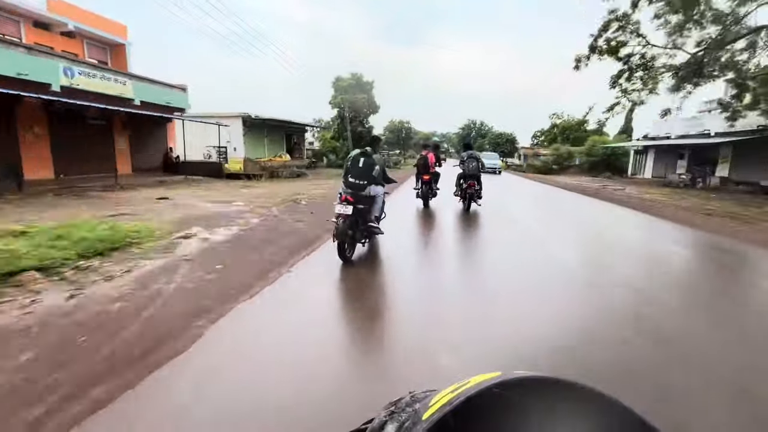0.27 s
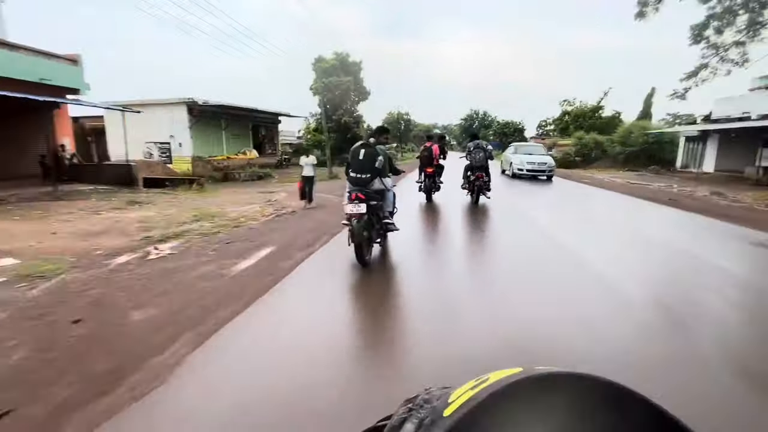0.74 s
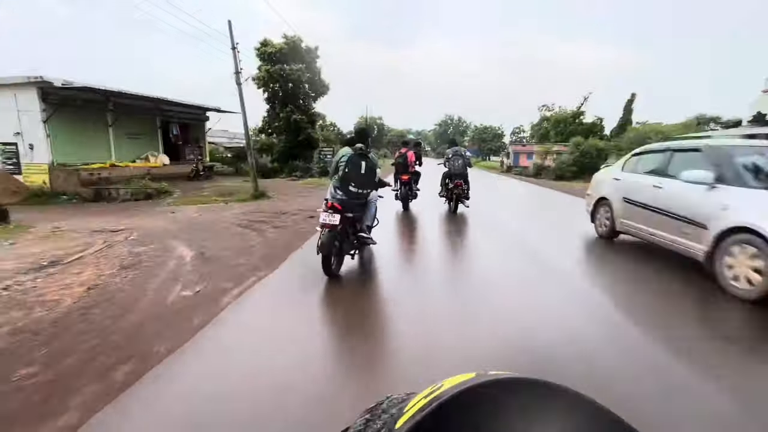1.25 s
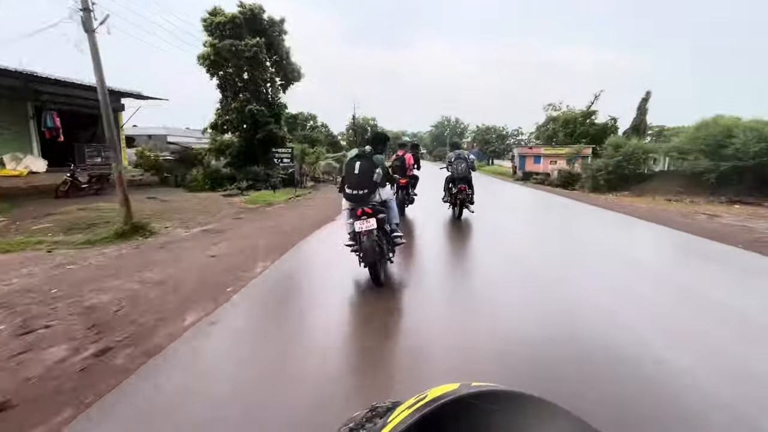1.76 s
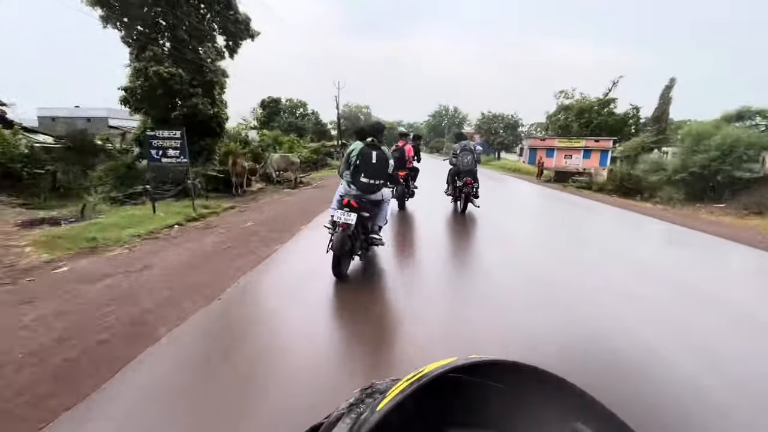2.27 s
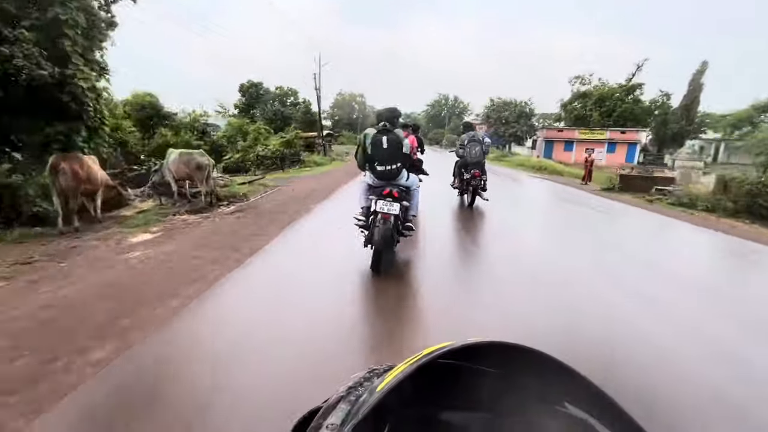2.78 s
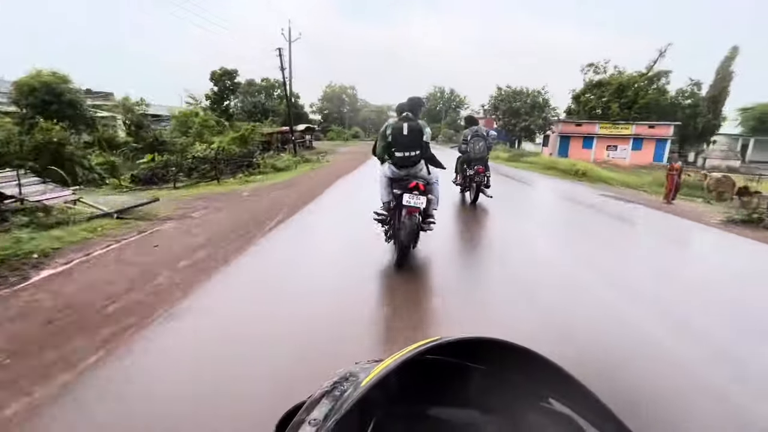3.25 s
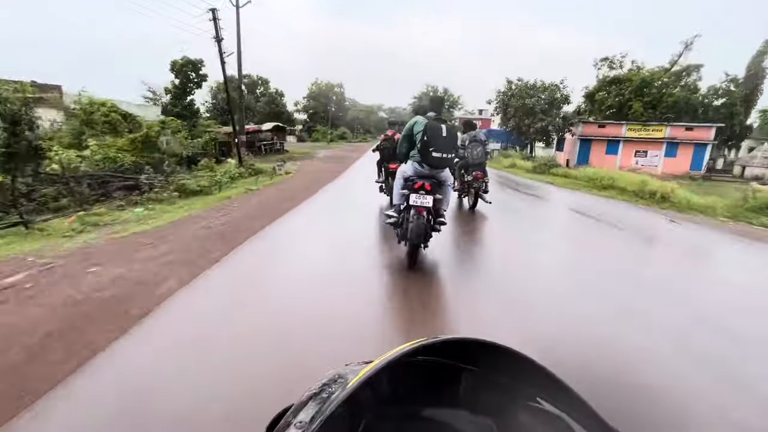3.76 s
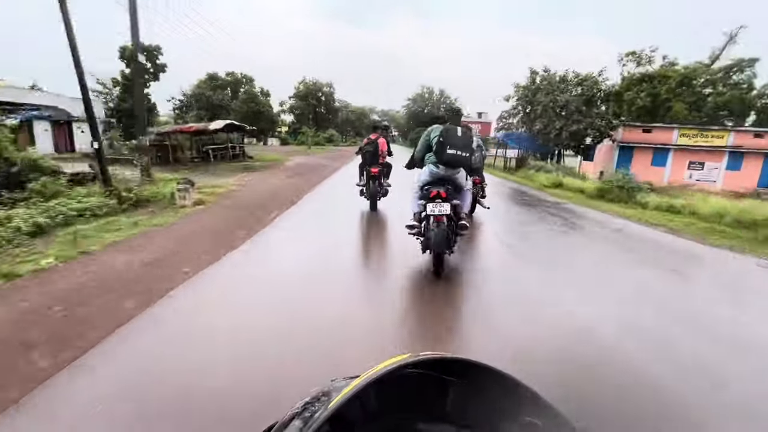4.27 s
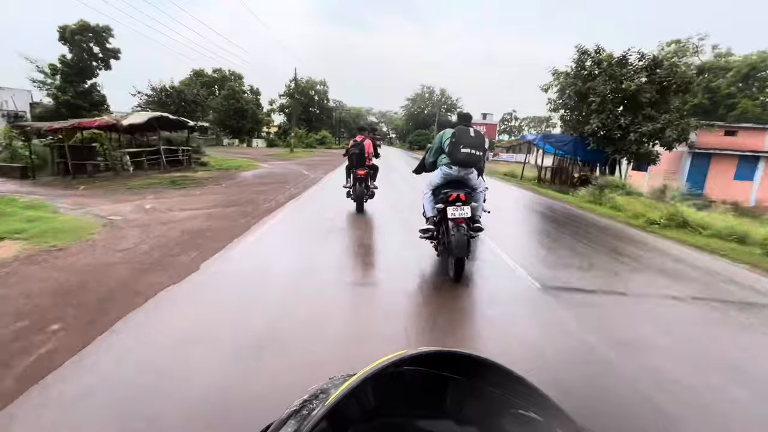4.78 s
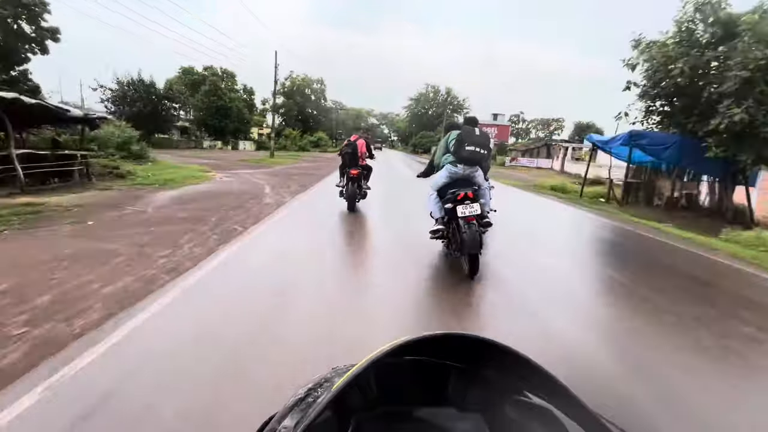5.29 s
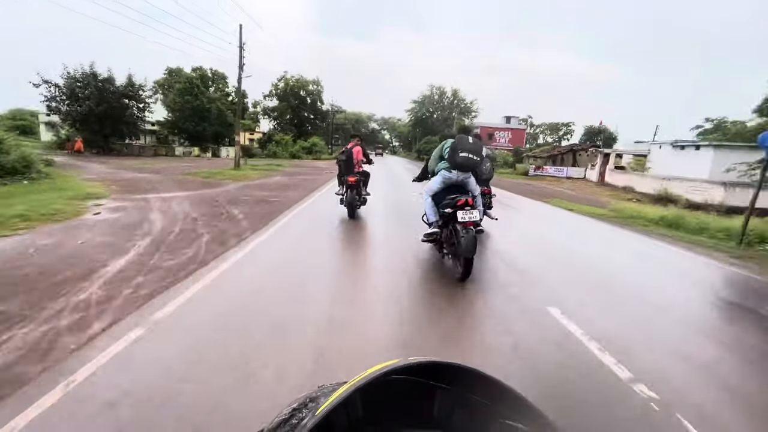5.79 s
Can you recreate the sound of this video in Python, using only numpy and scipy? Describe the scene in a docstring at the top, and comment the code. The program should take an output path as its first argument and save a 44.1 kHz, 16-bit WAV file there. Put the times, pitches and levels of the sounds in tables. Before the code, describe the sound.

Onboard a single-cylinder motorcycle on a wet road: deep throbbing engine boom surging and dropping under wind buffeting, tyre roar, spray hiss, knocks and ticks.

```python
"""One hears a throbbing single-cylinder motorcycle under wind buffeting, on a wet road, its boom dropping and swelling.
The place is the rider's own: a camera carried on the ride, its two microphone ports close to engine, wind and wheels.
Firings ring exhaust resonances; shaped noise makes wind, air and tyre roar, gas puffs, spray and mist.
Damped rings make the wheel ticks, drops and grit; noise bursts and short hollow notes make the knocks and thumps."""
import sys
import numpy as np
from scipy import signal
from scipy.fft import rfft, irfft, next_fast_len
from scipy.io import wavfile
from scipy.ndimage import uniform_filter1d

SR = 44100
rng = np.random.default_rng(int(sys.argv[2]) if len(sys.argv) > 2 else 0)


def wrap_up_sound(samples):
    """Save the sound to the file named by the first command line argument, as 16-bit audio."""
    columns = np.atleast_2d(samples).T
    # keep every value between -1 and 1, then stretch to whole-number steps
    tamed = np.clip(columns, -1, 1)
    steps = np.round(tamed * 32767).astype(np.int16)
    wavfile.write(sys.argv[1], SR, steps)


N = 265871
T = np.arange(N) / SR  # time of each sample, s

# Engine speed: (time [s], firing rate [1/s])
FIRING_RATE = [(0.0, 29.93), (0.5, 29.83), (1.0, 29.32), (2.0, 28.89), (2.5, 28.87), (4.0, 27.76),
               (5.0, 27.51), (5.5, 27.51), (6.03, 27.32)]
# Low boom of exhaust and wind outside the lulls: (time [s], level [dB])
BOOM_LEVEL = [(0.0, -23), (0.9, -32), (1.45, -23), (1.85, -25.5), (2.3, -18), (3.1, -24.5), (3.75, -16),
              (4.6, -18), (5.0, -15.5), (5.4, -24), (6.03, -15.5)]
# Boom lulls: (start [s], time from start until recovery begins [s], depth [dB])
BOOM_LULLS = [(0.063, 0.09, 27), (0.64, 0.18, 19.5), (0.875, 0.29, 26), (1.562, 0.18, 23),
              (2.52, 0.31, 35.5), (3.229, 0.13, 14), (4.49, 0.045, 7), (4.995, 0.14, 23),
              (5.717, 0.086, 7.5)]
# Wind on the ports, relative spectrum: (frequency [Hz], density [dB per Hz])
BUFFET_COLOUR = [(20, -47), (42, -28), (62, 6.5), (85, 0), (115, 23), (150, 5), (200, -24.5), (260, -19),
                 (600, -74)]
# Air and tyre roar between gusts: (time [s], level [dB])
RUSH_LEVEL = [(0.0, -39), (1.1, -38), (2.4, -34.5), (3.5, -36.5), (4.5, -32.5), (6.03, -35)]
# Air and tyre roar, relative spectrum: (frequency [Hz], density [dB per Hz])
RUSH_COLOUR = [(160, -47), (230, -16), (300, -19.5), (400, 3), (520, 3.5), (650, -1), (820, -1), (1120, -2),
               (1270, 2.5), (1550, -2.5), (1900, -10), (2300, -21), (3200, -52), (7000, -49)]
# Gusts: (middle [s], half length [s], roar lift [dB], spray lift [dB])
GUSTS = [(0.15, 0.11, 2, 5), (0.691, 0.06, 5.5, 1.5), (0.87, 0.024, 3.5, 0), (1.294, 0.089, 1, 4.5),
         (1.47, 0.055, 1, 5.5), (1.653, 0.098, 0.5, 3.5), (2.541, 0.063, 4, 0), (2.654, 0.045, 3.5, 5.5),
         (2.813, 0.019, 6, 8.5), (3.227, 0.082, 3.5, 3.5), (4.036, 0.02, 2, 0), (4.26, 0.1, 1, 2.5),
         (5.023, 0.074, 5, 4), (5.507, 0.094, 2.5, 7.5), (5.75, 0.086, 4, 3), (5.94, 0.074, 4.5, 5)]
# Ragged air in gusts, relative spectrum: (frequency [Hz], density [dB per Hz])
BLUSTER_COLOUR = [(150, -35), (210, -11), (350, -14), (550, 0), (750, 6), (1000, -3), (1400, -7),
                  (2400, -19), (4500, -40)]
# Spray hiss, relative spectrum: (frequency [Hz], density [dB per Hz])
SPRAY_COLOUR = [(1200, 0.5), (2300, 6.5), (2900, 0.5), (3700, 4), (4600, 1), (5150, -3), (5600, -2.5),
                (6300, -1), (7300, -8), (9000, -13), (11000, -27)]
# Fine mist off the wet road: (time [s], level [dB])
MIST_LEVEL = [(0.0, -58), (1.1, -58), (1.42, -51.5), (2.05, -58), (3.6, -56), (4.18, -53.5), (4.36, -60),
              (4.55, -52.5), (4.8, -56), (6.03, -55.5)]
# Mist, relative spectrum: (frequency [Hz], density [dB per Hz])
MIST_COLOUR = [(6000, -23), (7700, -2.5), (8250, 5), (9500, 1), (10300, -6), (11000, -18), (11600, -53)]
# Ticking wheel: (time [s], speed [turns/s])
WHEEL_SPEED = [(0.0, 14.66), (1.0, 14.8), (1.7, 14.9), (2.5, 14.78), (3.4, 14.71), (5.0, 14.76),
               (6.03, 14.76)]
# How hard the wheel brushes, before each tick's random unevenness: (time [s], level [dB])
BRUSH_FORCE = [(0.0, -60), (1.2, -50), (1.72, -36), (2.05, -49), (2.6, -41), (2.95, -27.5), (3.2, -50),
               (3.65, -35.5), (3.85, -38), (4.3, -39.5), (4.5, -35.5), (4.8, -36), (5.05, -28),
               (5.25, -36.5), (5.85, -28)]
# Body of a tick, damped modes: (frequency [Hz], width [Hz], relative level [dB])
TICK_BODY = [(4240, 250, 4), (4640, 160, 3.5), (5590, 155, 3.5), (6500, 420, -30)]
# Bright edge of a tick, damped modes: (frequency [Hz], width [Hz], relative level [dB])
TICK_EDGE = [(6880, 310, -3.5), (8370, 130, -8), (8940, 175, -6.5), (9590, 180, -2), (10900, 560, -5)]
# Big drops beside the left port, before panning: (time [s], peak level [dB])
BIG_DROPS = [(0.147, -33), (0.34, -34), (0.6928, -34), (0.7257, -33), (0.806, -37), (0.864, -30.5),
             (1.4696, -31), (1.727, -31.5), (2.805, -33.5), (3.265, -32.5), (5.492, -31), (5.6672, -35)]
# Ring of a drop, damped modes: (frequency [Hz], width [Hz], relative level [dB])
DROP_RING = [(2040, 160, 2), (3600, 840, 19.5), (4500, 1050, 11), (6000, 900, -27)]
# Bodywork knocks, peak before panning:
# (time [s], peak level [dB], ring frequency [Hz], 60 dB decay [s], left minus right [dB])
KNOCKS = [(0.450, -21, 1230, 0.0075, 12.5), (0.473, -34.5, 850, 0.011, 15), (0.578, -28, 1010, 0.036, 14.5),
          (0.898, -21, 1400, 0.016, 7), (1.432, -19.5, 1420, 0.032, 8), (1.442, -20, 1160, 0.05, 3),
          (1.617, -26, 1050, 0.08, -14.5), (2.503, -16, 1340, 0.042, 4), (2.574, -24, 1300, 0.016, 9),
          (2.615, -25.5, 1540, 0.0065, 12), (2.645, -23.5, 1500, 0.027, 12.5),
          (2.789, -21, 1120, 0.031, -2), (3.210, -26.5, 1090, 0.032, -21), (3.265, -25, 1260, 0.055, 15),
          (5.004, -19, 990, 0.028, -15), (5.015, -17.5, 1020, 0.033, 18), (5.237, -23, 900, 0.032, 7),
          (5.646, -22, 1130, 0.018, 1), (5.906, -20, 1300, 0.027, 1)]
# Hollow thumps: (time [s], peak level [dB], ring frequency [Hz])
THUMPS = [(1.279, -23.5, 341), (4.160, -12, 344), (4.304, -16.5, 367), (5.721, -16.5, 361)]
# Hollow chug of the exhaust: (time [s], level [dB])
CHUG_LEVEL = [(0.0, -57), (1.1, -45), (1.9, -44.5), (2.45, -28), (2.7, -40.5), (3.1, -38.5), (3.45, -51.5),
              (3.85, -29.5), (4.3, -24.5), (4.42, -33), (4.75, -26.5), (5.02, -23), (5.12, -37.5),
              (6.03, -34.5)]
# Gas puffs, relative spectrum: (frequency [Hz], density [dB per Hz])
CHUG_COLOUR = [(130, -55), (200, -3.5), (250, -5.5), (305, 0), (345, -1.5), (390, 2.5), (440, -24.5),
               (500, -4), (620, -14.5), (1000, -29), (2000, -57)]
# Microphone ports: (frequency [Hz], coherence [0-1], phase by which left leads [rad], left minus right [dB])
PORTS = [(110.0, 0.86, -1.0, -0.9), (200.0, 0.37, -2.1, 0.7), (310.0, 0.59, -1.3, -0.1),
         (400.0, 0.73, -2.2, 0.7), (520.0, 0.76, -2.9, -0.9), (850.0, 0.48, -4.1, -0.2),
         (1100.0, 0.23, -6.8, 1.7), (1400.0, 0.57, -6.9, 3.4), (2500.0, 0.33, -8.1, 0.9),
         (3500.0, 0.12, -7.9, 6.5), (4500.0, 0.44, -6.1, 4.1), (7500.0, 0.3, -4.6, -0.3),
         (8500.0, 0.19, -2.8, -6.4), (10500.0, 0.11, -1.3, -15.6)]


def amp(db):
    """Decibels to gain."""
    return 10 ** (np.asarray(db) / 20)


def unit(x):
    """Scales to rms 1."""
    return x / np.sqrt(np.mean(x ** 2) + 1e-20)


def curve(rows):
    """Each column of a time table, sample by sample."""
    s, *columns = np.transpose(rows)
    return [np.interp(T, s, column) for column in columns]


def read(rows, hz):
    """Each column of a frequency table, on a log axis."""
    f, *columns = np.transpose(rows)
    return [np.interp(np.log(hz + 1), np.log(f + 1), column) for column in columns]


def add(mix, s, sound):
    """Mixes a stereo sound in at time s."""
    part = mix[:, max(round(s * SR), 0):][:, :sound.shape[1]]
    part += sound[:, :part.shape[1]]


def pan(db):
    """Left and right gains for a level difference, left minus right."""
    return amp(np.array([[db], [-db]]) / 2)


def wander(top_hz):
    """Smooth random motion, low-passed around top_hz; rms 1."""
    size = next_fast_len(N)
    hz = np.fft.rfftfreq(size, 1 / SR)
    spectrum = rfft(rng.standard_normal(size)) / (1 + (hz / top_hz) ** 2)
    return unit(irfft(spectrum, size)[:N])


def smooth(grid, frames, bins):
    """Blurs a random grid over time frames and frequency bins; rms 1."""
    return unit(uniform_filter1d(uniform_filter1d(grid, size=frames, axis=0), size=bins, axis=1))


def air(colour, patchy_db, ripple_db=0.):
    """Turbulent noise with drifting patches, partly shared between the two ports; rms 1."""
    frames, hz = N // 512 + 6, np.fft.rfftfreq(2048, 1 / SR)
    a, b, c, d, patches = rng.standard_normal((5, frames, len(hz)))
    patches = smooth(patches, frames=4, bins=22)
    # reflections off rider and bike cut fine, slowly shifting ripples into the spectrum
    ripples = smooth(rng.standard_normal(a.shape), frames=40, bins=2)
    coherence, phase, side_db = read(PORTS, hz)
    coherence = np.clip(coherence, 0, 1)
    left = a + 1j * b
    own = c + 1j * d  # noise only the right port hears
    right = (coherence * left + np.sqrt(1 - coherence ** 2) * own) * np.exp(-1j * phase)
    z = np.array([left * amp(side_db / 2), right * amp(-side_db / 2)])
    z *= amp(read(colour, hz)[0] + patchy_db * patches + ripple_db * ripples)
    return unit(signal.istft(z.transpose(0, 2, 1), nperseg=2048, noverlap=1536)[1][:, :N])


def ring(modes, left_lag_s=0.0007, rise_s=0.00024, detune=0.023):
    """A short ring of damped modes, randomly detuned, peak 1; it reaches the left port later."""
    t = np.maximum(np.arange(700) / SR - np.array([[left_lag_s], [0]]), 0)
    y = 0
    for hz, width, db in modes:
        cycles = hz * (1 + detune * rng.standard_normal()) * t + rng.random()
        y = y + amp(db) * np.exp(-np.pi * width * t) * np.sin(2 * np.pi * cycles)
    y = y * (1 - np.exp(-(t / rise_s) ** 2))
    return y / abs(y).max()


def swell(t, peak_s):
    """The envelope of a cavity that builds up to 1 at peak_s and dies away."""
    u = np.maximum(t, 0) / peak_s
    return (u * np.exp(1 - u)) ** 2


def crank(first_firing=0.2716):
    """Engine cycles gone by; the cylinder fires at each whole number."""
    return np.cumsum(curve(FIRING_RATE)[0]) / SR - first_firing


def firings(hz, build_s, uneven_db, jitter_s, port_db, left_lag_s, late_s):
    """Each firing, a little uneven in strength, time and side, rings one exhaust resonance; rms 1."""
    fired = T[1:][np.diff(np.floor(crank())) > 0]
    out = np.zeros((2, N))
    t = np.arange(SR // 8) / SR - np.array([[left_lag_s], [0]])
    note = swell(t, build_s) * np.sin(2 * np.pi * hz * t)
    for s, (strength, slip, side) in zip(fired, 2 * rng.random((len(fired), 3)) - 1):
        gains = amp(uneven_db * strength) * pan(port_db * side)
        add(out, s + late_s + jitter_s * slip, gains * note)
    return unit(out)


def exhaust(level_db=-0.36):
    """The deep note of the silencer, near four times the firing rate, rung by each firing."""
    note = firings(hz=111.4, build_s=0.015, uneven_db=1.0, jitter_s=0.00035,
                   port_db=8.0, left_lag_s=0.0015, late_s=0)
    return amp(level_db) * note


def buffet(level_db=-2.0):
    """Wind turbulence rumbles on the microphone ports."""
    return amp(level_db) * air(BUFFET_COLOUR, patchy_db=-3.5)


def boom_level(fall_s=0.076, recover_s=0.1):
    """Gain of the low boom: it falls quickly into each lull and recovers more slowly."""
    down = 0
    for s, hold, depth in BOOM_LULLS:
        fall = np.clip((T - s) / fall_s, 0, 1)
        recovery = np.exp(-np.maximum(T - s - hold, 0) / recover_s)
        down = down + depth * fall * recovery
    return amp(curve(BOOM_LEVEL)[0] - down)


def boom(flutter_db=0.52, flutter_hz=21.2):
    """Exhaust and wind together, beating evened out; their strength swells and sinks, and drops in the lulls."""
    low = (exhaust() + buffet()) * amp(flutter_db * wander(flutter_hz))
    power = (low ** 2).mean(0)
    strength = np.sqrt(uniform_filter1d(uniform_filter1d(power, size=SR // 14), size=SR // 14))
    return low / strength * boom_level()


def rush(gust_db, flutter_db=1.5, flutter_hz=85.4, sway_db=0.88, sway_hz=30.0, throb_db=-0.2):
    """Air and tyre roar, fluttering in the slipstream and dipping slightly at each firing."""
    motion_db = flutter_db * wander(flutter_hz) + sway_db * wander(sway_hz)
    flutter = unit(amp(motion_db + throb_db * np.cos(2 * np.pi * crank())))
    return air(RUSH_COLOUR, patchy_db=1.5, ripple_db=2.5) * flutter * amp(curve(RUSH_LEVEL)[0] + gust_db)


def crackle(gust_db, grains_per_s=620, spread_db=7.5, level_db=-15.5, surge=2.6, width_hz=580.0, fall_db=-13.5):
    """Water and grit pepper the bike as short damped rings, louder in gusts; level_db is relative to the roar."""
    out = np.zeros((2, N))
    pitches = np.geomspace(850, 4600, num=8)
    for hz in pitches:
        hits = np.zeros(N)
        at = np.flatnonzero(rng.random(N) < grains_per_s / len(pitches) / SR)
        hits[at] = amp(spread_db * np.minimum(rng.exponential(1, N)[at], 3))
        grain = ring([(hz, width_hz, 0)], rise_s=0.00019) * amp(fall_db * np.log2(hz))  # weaker by the octave
        out += signal.oaconvolve(hits[None], grain, axes=1)[:, :N]
    # surge: dB of crackle per dB of gust
    return unit(out * pan(db=3.5)) * amp(curve(RUSH_LEVEL)[0] + surge * gust_db + level_db)


def spray(gust_db, hiss_db=-50.5, flutter_db=1.9, patter_db=-65.5, drops_per_s=260, spread_db=1.5):
    """Water off the tyres: noise hiss and a patter of ringing drops that swell in gusts, and a finer mist."""
    hiss = air(SPRAY_COLOUR, patchy_db=1.46, ripple_db=2.) * amp(hiss_db + flutter_db * wander(top_hz=120.))
    strengths = amp(spread_db * np.minimum(rng.exponential(1, N), 4))
    landings = (rng.random(N) < drops_per_s / SR) * strengths
    patter = signal.oaconvolve(landings[None], ring(DROP_RING), axes=1)[:, :N]
    patter = unit(patter * pan(db=-12.0))
    mist = air(MIST_COLOUR, patchy_db=2.5, ripple_db=3.0) * amp(curve(MIST_LEVEL)[0])
    return (hiss + amp(patter_db) * patter) * amp(gust_db) + mist


def wheel(first_turn=0.393, uneven_db=3.5, edge_db=-39.5, edge_follow=0.29, edge_uneven_db=6.0, edge_side_db=-11.5):
    """A thin metallic tick once a wheel turn, never equally strong: a brief brush, so it starts softly."""
    out = np.zeros((2, N))
    turned = np.cumsum(curve(WHEEL_SPEED)[0]) / SR - first_turn
    ticks = T[1:][np.diff(np.floor(turned)) > 0]
    force = np.interp(ticks, *np.transpose(BRUSH_FORCE))
    for s, db, (body, edge) in zip(ticks, force, 2 * rng.random((len(ticks), 2)) - 1):
        # the bright edge follows the force only in part
        bright_db = edge_db + edge_follow * (db - force.mean()) + edge_uneven_db * edge
        add(out, s, amp(db + uneven_db * body) * ring(TICK_BODY, left_lag_s=0.00024, rise_s=0.0006))
        add(out, s, amp(bright_db) * pan(edge_side_db) * ring(TICK_EDGE, left_lag_s=.00005, rise_s=0.0007))
    return out


def gusts():
    """How many dB the gusts add to the roar and to the spray; each rises and falls like a bell."""
    lift_db = np.zeros((2, N))
    for s, half, roar_db, spray_db in GUSTS:
        lift_db += np.outer([roar_db, spray_db], np.exp(-((T - s) / half) ** 2))
    return lift_db


def bluster(gust_db, level_db=-0.5, flutter_db=4.0, flutter_hz=70.0):
    """A lower, ragged rush of turbulent air that sounds only in gusts."""
    flutter = unit(amp(flutter_db * wander(flutter_hz)))
    gusting = amp(gust_db) - 1  # zero in still moments
    return air(BLUSTER_COLOUR, patchy_db=6.0) * flutter * gusting * amp(curve(RUSH_LEVEL)[0] + level_db)


def drops(gust_db, side_db=21.0, stray_per_s=3.5, stray_db=-45.0, spread_db=2.5, bounce_db=-7.0, bounce_s=0.0019):
    """Big drops tap the camera and ring, each with a smaller splash just after; gusts bring more stray ones."""
    out = np.zeros((2, N))
    for s, db in BIG_DROPS:
        add(out, s, amp(db) * ring(DROP_RING, rise_s=0.00044))
        add(out, s + bounce_s, amp(db + bounce_db) * ring(DROP_RING, rise_s=0.00032))
    # stray_per_s is the rate between gusts
    landed = rng.random(N) < stray_per_s * amp(gust_db) ** 2 / SR
    strays = landed * amp(stray_db + spread_db * (2 * rng.random(N) - 1))
    out += signal.oaconvolve(strays[None], ring(DROP_RING, rise_s=0.0011), axes=1)[:, :N]
    return pan(side_db) * out


def bumps(knock_width_hz=1810.0, rise_s=0.00078, thump_build_s=0.0084, left_lag_s=0.00075):
    """The rough road shakes the bike: dry noise knocks and hollow thumps, reaching the right port first."""
    t, out = np.arange(SR // 8) / SR, np.zeros((2, N))
    hz = np.fft.rfftfreq(len(t), 1 / SR)
    late = t - np.array([[left_lag_s], [0]])
    for s, db, ring_hz, t60, side_db in KNOCKS:
        band = 1 / (1 + (2 * (hz - ring_hz) / knock_width_hz) ** 6)
        panel = irfft(rfft(rng.standard_normal(len(t))) * band, len(t))
        knock = panel * amp(-60 * t / max(t60, .003)) * (1 - np.exp(-t / rise_s))
        heard = np.interp(late, t, knock, left=0) / abs(knock).max()
        add(out, s, amp(db) * pan(side_db) * heard)
    for s, db, ring_hz in THUMPS:
        add(out, s, amp(db) * swell(late, thump_build_s) * np.sin(2 * np.pi * ring_hz * late))
    return out


def chug(throb_db=3.0, note_db=-3.0, puff_growth=0.088):
    """Every firing also knocks a higher, hollow resonance and lets out a puff of gas that grows with effort."""
    effort_db = curve(CHUG_LEVEL)[0]
    note = firings(hz=352.8, build_s=0.0075, uneven_db=7.5, jitter_s=0.00076,
                   port_db=4.0, left_lag_s=0.00075, late_s=-0.00462)
    throb = unit(amp(throb_db * np.cos(2 * np.pi * crank())))
    puffs = air(CHUG_COLOUR, patchy_db=2.03, ripple_db=1.0) * throb
    puff_db = puff_growth * (effort_db - effort_db.max())  # extra growth, dB per dB of effort
    return (amp(note_db) * note + amp(puff_db) * puffs) * amp(effort_db)


def scene():
    """Engine, wind, road and water together at the rider's microphone ports."""
    roar_db, wet_db = gusts()
    road = rush(roar_db) + bluster(roar_db) + crackle(roar_db) + bumps()
    return boom() + chug() + road + spray(wet_db) + drops(wet_db) + wheel()


def record(dry, low_cut_hz=63.0, ceiling=0.62, top_hz=11200):
    """The camera cuts the deepest bass, rounds off the highest peaks and limits the band."""
    hz = np.fft.rfftfreq(N, 1 / SR)
    y = irfft(rfft(dry) * hz ** 4 / (hz ** 4 + low_cut_hz ** 4), N)
    y = y / (1 + (y / ceiling) ** 6) ** (1 / 6)
    low_pass = signal.firwin(255, top_hz, window=("kaiser", 9), fs=SR)
    return signal.oaconvolve(y, low_pass[None], "same")


dry = scene()
out = record(dry)
wrap_up_sound(out)
```